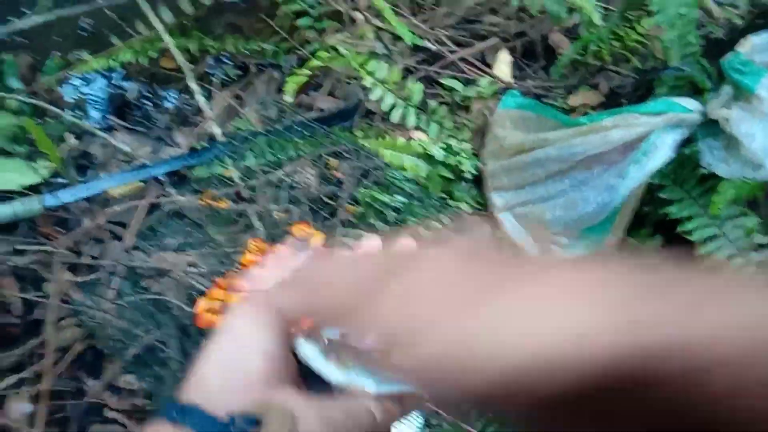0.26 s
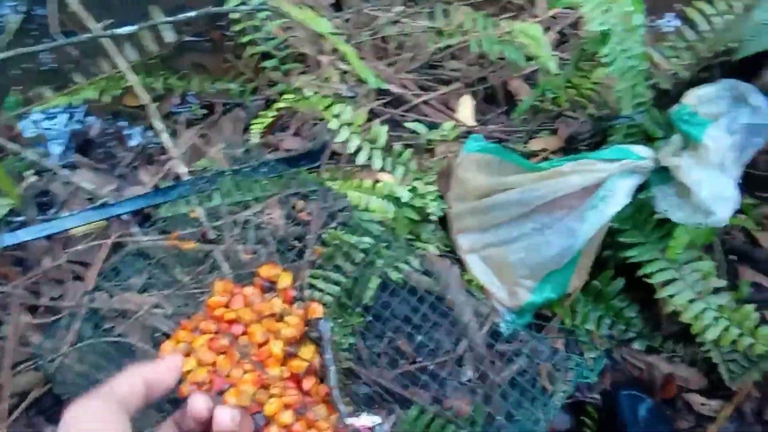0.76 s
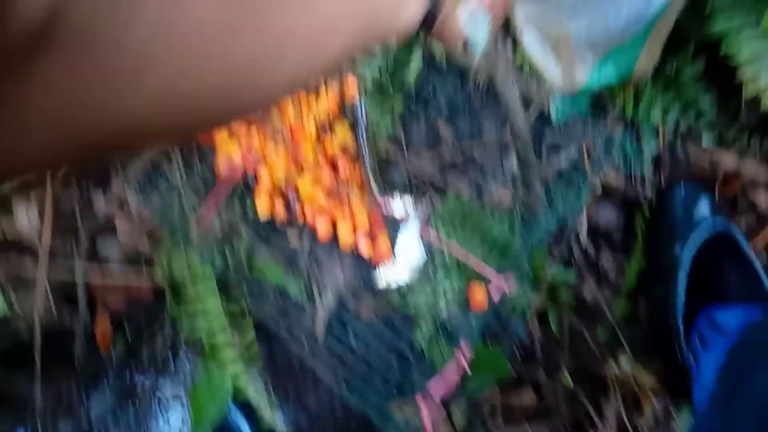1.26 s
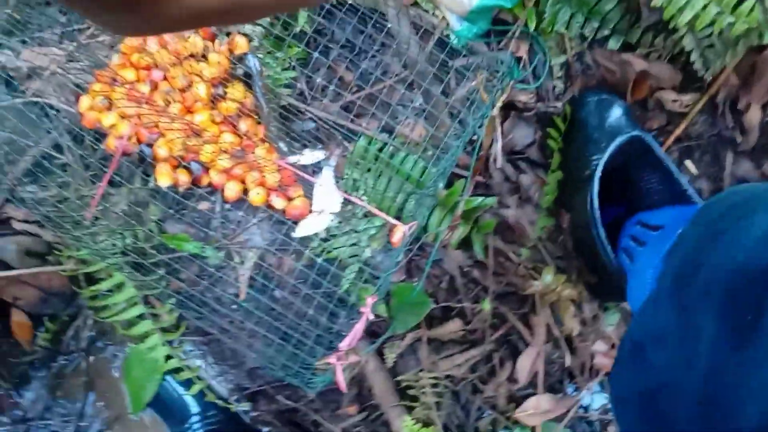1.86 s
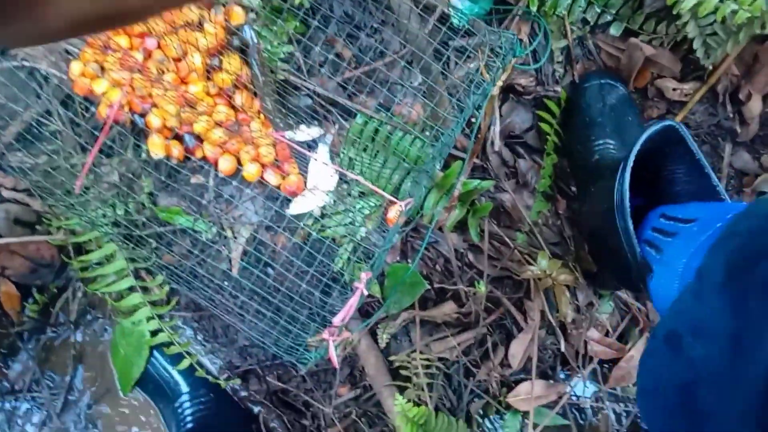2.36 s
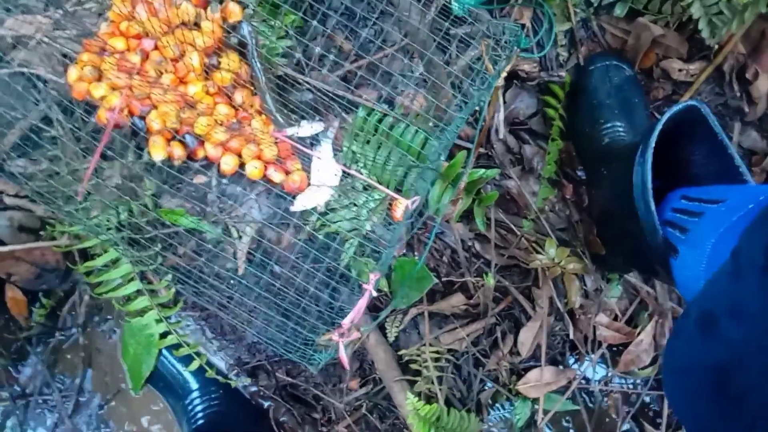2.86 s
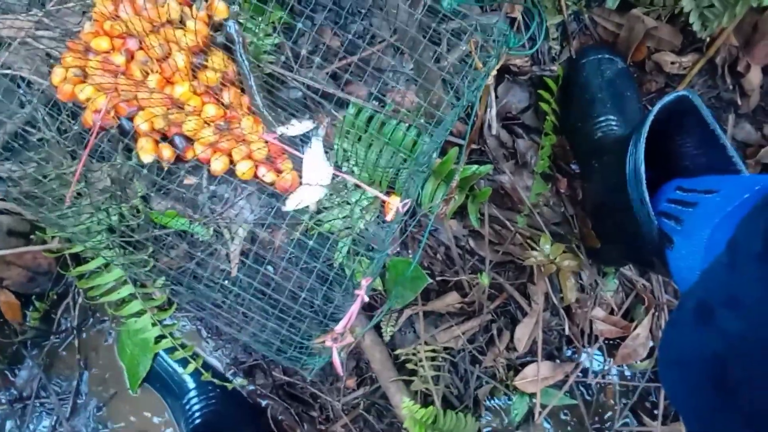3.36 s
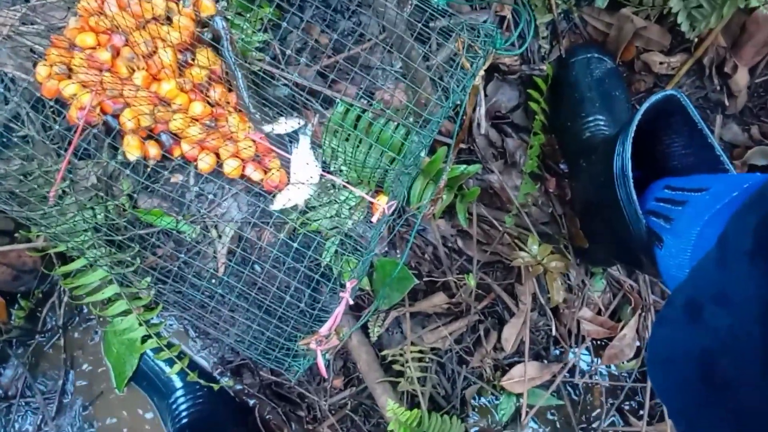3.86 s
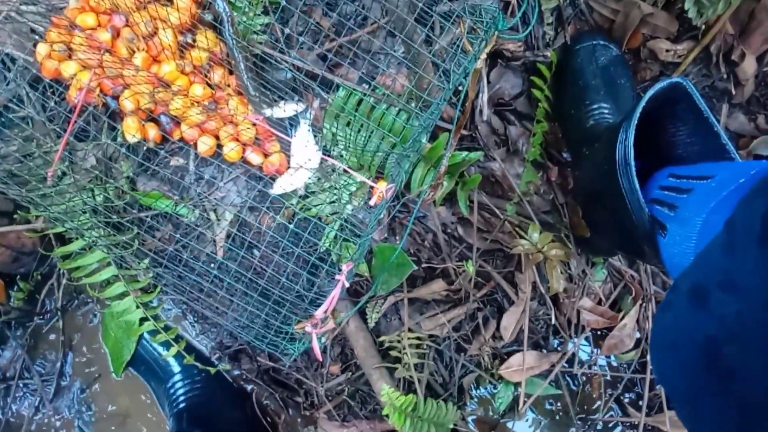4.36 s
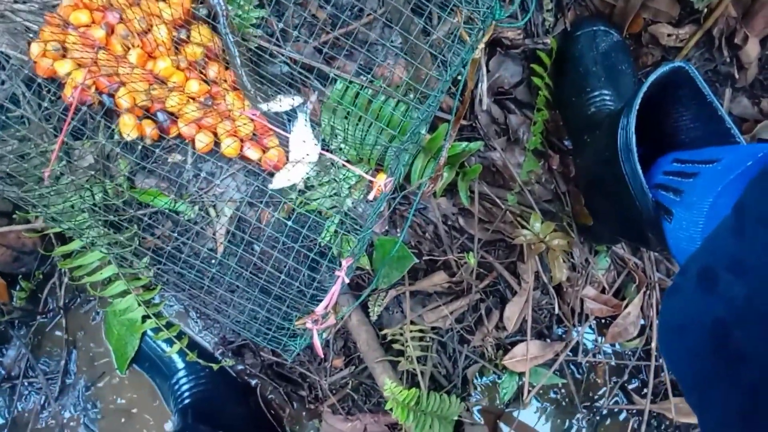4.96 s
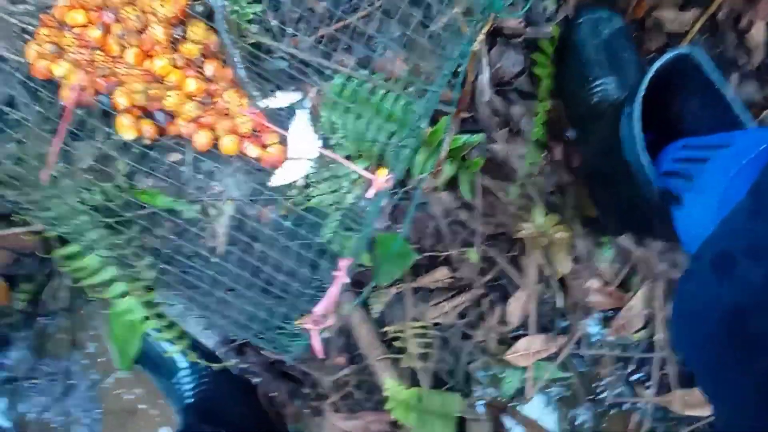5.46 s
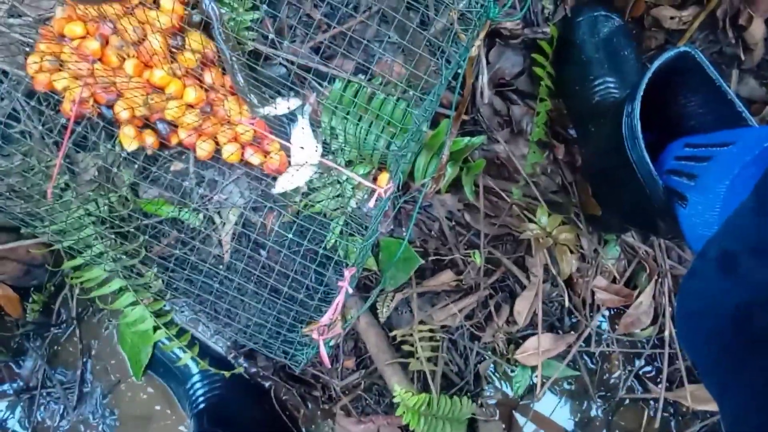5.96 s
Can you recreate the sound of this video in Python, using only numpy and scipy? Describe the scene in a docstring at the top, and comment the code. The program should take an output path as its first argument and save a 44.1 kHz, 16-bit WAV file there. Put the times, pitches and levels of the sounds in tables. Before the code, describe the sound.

Throughout, distant insects make a steady, shrill drone in a swampy forest, with one nearby cricket pulsing rapidly inside it and a very faint rush of air beneath. Between about 0.3 and 0.9 seconds a small frog croaks four times, each croak short, bright and ringing briefly among the trees. These are the loudest sounds, along with a sharp bump on the small camera's microphone during the third croak. Softer handling thumps follow until about 2 seconds. From around 1 second someone shifts close by: dull shuffling, dead leaves rustling and twigs ticking, with a sharper snap near 3.2 seconds. A short lull leaves mostly the insects. From about 4.2 seconds fern fronds tick lightly against a wire net, and from 5.4 seconds they rustle and click louder, with a few faint wire scrapes, until the end just after 6 seconds.

```python
"""A swampy forest floor, on a small camera's microphone. From the start, far insects merge into a shrill
drone and one near cricket pulses in it, scraping its wings. In the first second a small frog croaks four
times, pulses ringing its throat; on the third croak the camera is bumped, and softer pushes follow.
Someone shifts about close by: dead leaves rustle and twigs tick until just after 3 s. After a lull,
fern fronds rustle and tick on a wire net, louder towards the end."""
import sys
import numpy as np
from scipy import signal
from scipy.fft import rfft, irfft, next_fast_len
from scipy.io import wavfile
from scipy.ndimage import uniform_filter1d, map_coordinates

SR = 44100
rng = np.random.default_rng(int(sys.argv[2]) if len(sys.argv) > 2 else 0)


def store_wav(level_fs):
    """Save 16-bit WAV to argv[1]."""
    pcm = np.round(np.clip(np.atleast_2d(level_fs), -1, 1) * 32767)
    wavfile.write(sys.argv[1], SR, pcm.T.astype(np.int16))


N = 274302


def amp(db):
    return 10 ** (np.asarray(db) / 20)


def unit(x):
    return x / np.sqrt(np.mean(x ** 2) + 1e-20)


def along(points, hz):
    """Reads (f/Hz, value) points on a log axis."""
    f, v = np.transpose(points)
    return np.interp(np.log(hz + 1), np.log(f + 1), v)


def curves(rows):
    """One value per sample for each column after the time."""
    s, *cols = np.transpose(rows)
    return [np.interp(np.arange(N) / SR, s, c) for c in cols]


def wobble(rate):
    """A smooth random curve, rate knots a second."""
    return map_coordinates(rng.standard_normal(int(N * rate / SR) + 4), [np.arange(N) * rate / SR])


def filtered(x, response):
    """x through a complex frequency response."""
    m = next_fast_len(len(x) + min(4 * len(x), SR // 4))
    return irfft(rfft(x, m) * response(np.fft.rfftfreq(m, 1 / SR)), m)[:len(x)]


def peak(f, hz, width):
    """A causal resonance of gain 1."""
    return 1j * f * width / (hz * hz - f * f + 1j * f * width)


def rush(spectrum, source, patchy_db):
    """The source coloured, with patches of random gain, at rms 1."""
    z = signal.stft(source, nperseg=512)[2]
    field = uniform_filter1d(uniform_filter1d(rng.standard_normal(z.shape), 6, 0), 8, 1)
    patchy = signal.istft(z * amp(patchy_db * unit(field)), nperseg=512)[1][:N]
    return unit(filtered(patchy, lambda hz: amp(along(spectrum, hz))))


def add(track, s, sound):
    """Mixes a sound in at s seconds."""
    part = track[round(s * SR):][:len(sound)]
    part += sound[:len(part)]


# Modes of the frog's throat: f/throat pitch, level/dB, t60/s, change as the air pressure falls/dB
THROAT_MODES = [(0.462, -11, 0.023, -6.5), (.63, -5.5, 0.013, -13), (.92, -21.5, 0.004, -18),
                (1.002, 16, 0.0034, -10), (1.169, -2.5, 0.0047, 0), (1.45, -17, 0.0099, -25.5)]


def throat_pulse(hz, sustain, done):
    """One pulse rings the throat, which sinks in pitch and dulls as done runs from 0 to 1."""
    t = np.arange(SR // 25) / SR
    slack = 1 / (1 + np.exp((.62 - done) / 0.12))  # pressure gives way in the last third
    phase = 2 * np.pi * hz * (1 - 0.12 * done) * t
    ring = sum(amp(db + drop * slack - 60 * t / (t60 * sustain)) * np.sin(ratio * phase)
               for ratio, db, t60, drop in THROAT_MODES)
    return ring * (1 - np.exp(-t / (0.00017 + 0.00029 * slack)))


# The frog's calls: t/s, rms level/dB, length/s, first and last pulse rate/Hz, throat pitch/Hz,
# t60 factor, unevenness (0-1), gain of the hollow/dB, peak of the lingering mode/dB
CROAKS = [(0.2969, -25.5, 0.041, 290.7, 557, 3236, 1.3, 0.059, -.5, -37),
          (0.4645, -30.5, .04, 311.4, 434, 3046, 0.9, 0.42, 1.5, -47),
          (0.634, -26, .036, 355.8, 415.5, 3004, 2.3, 0.41, 0.85, -51),
          (0.811, -26.5, 0.032, 337.3, 452, 2860, 2.4, 0.43, 2, -47)]
# The hollow that rings after each call: f/Hz, level/dB, t60/s
HOLLOW_MODES = [(1165, -10, .05), (1370, -9, .05), (1715, -7, .07), (1850, -8, .07), (2354, -9, .1),
                (2487, -8, .1), (2583, -2, .1), (2675, -2, .1), (2975, -8, .25), (3097, -4, .1)]


def frog(linger_hz=2862, linger_t60=.32):
    """Quickening throat pulses make each croak; a hollow and the trees ring on, and one mode lingers."""
    out, t = np.zeros(N), np.arange(SR // 4) / SR
    width = lambda t60: np.log(1000) / np.pi / t60
    for s, db, length, first, last, hz, sustain, uneven, hollow_db, linger_db in CROAKS:
        rate = first + (last - first) * np.clip(t / length, 0, 1) ** 1.5
        new_pulse = np.diff(np.floor(np.cumsum(rate) / SR)) > 0
        onsets = np.r_[0, t[1:][new_pulse & (t[1:] < length)]]
        croak = np.zeros(len(t))
        for when, (late, size) in zip(onsets, uneven * rng.standard_normal((40, 2))):
            done = when / length
            pulse = amp(9.7 * size * np.sqrt(done)) * throat_pulse(hz, sustain, done)
            add(croak, abs(when + late * done / first / 2), pulse)
        croak = filtered(croak, lambda f: (peak(f, 1130, 1090) * 1j * f / 900) ** 4
                         / (1 + 1j * f / 5000) ** 3)
        croak *= amp(db) / np.sqrt(np.sum(croak ** 2) / (length * SR))
        modes = [(c, amp(g + hollow_db + rng.normal(0, 0.91)), width(t60)) for c, g, t60 in HOLLOW_MODES]
        hollow = filtered(croak, lambda f: sum(gain * peak(f, c, w) for c, gain, w in modes))
        lingering = filtered(croak, lambda f: peak(f, linger_hz, width(linger_t60)))
        waver = amp(linger_db + 2.2 * wobble(55)[:len(t)])
        add(out, s, croak + hollow + waver * lingering / abs(lingering).max())
        add(out, s + 0.0044, amp(-19) * echo(croak))
    return out


# Handling noise, right at the microphone: t/s, peak level before the bass cut/dB, f/Hz, t60/s
CAMERA_PUSHES = [(.6545, -24.5, 490, 0.019), (.6575, -30, 756, 0.0083), (.6612, -9.5, 283, 0.0024),
                 (0.6666, -26.5, 200, 0.012), (0.901, -34, 124, 0.041), (1.27, -32.5, 174, 0.031),
                 (1.295, -34, 207, 0.03), (1.456, -41.5, 245, 0.083), (1.683, -35, 430, 0.018),
                 (2.016, -34.5, 336, 0.05)]


def camera_bumps(crack_s=.6633, crack_db=-19, crack_hz=5500):
    """Each push starts softly and swings the camera body; the hardest makes the housing crack."""
    out, t = np.zeros(N), np.arange(SR // 10) / SR
    for s, db, hz, t60 in CAMERA_PUSHES:
        swing = np.sin(2 * np.pi * hz * t) * amp(-60 * t / t60) * (1 - np.exp(-t * hz * 4))
        add(out, s, -amp(db) * swing / abs(swing).max())
    burst = amp(-60 * t / 0.018) * rng.standard_normal(len(t))
    crack = filtered(burst, lambda f: peak(f, crack_hz, 5400))
    add(out, crack_s, amp(crack_db) * crack / abs(crack).max())
    return filtered(out, lambda f: 1 / (1 + 60 / (1j * f + 1)) ** 4)  # the microphone passes no deep bass


# Twigs and wire near the camera: t/s, peak level/dB, centre f/Hz, duller part re that peak/dB
TWIG_TICKS = [(0.7558, -45, 2700, -19), (1.374, -43, 2560, -19), (1.6092, -42, 1800, -17),
              (1.707, -43.5, 2970, -13), (1.7756, -41, 1640, -15), (1.8502, -44, 4330, -10),
              (1.8844, -47, 1310, -3), (1.8982, -44, 1793, 2), (1.9362, -32, 3240, -1),
              (2.0056, -39.5, 3150, -12), (2.0534, -38.5, 3220, -9), (2.0761, -38, 1830, -10),
              (2.1196, -33.5, 4450, -8), (2.1524, -36, 4470, -13), (2.2734, -35, 4400, -19),
              (2.3144, -36.5, 3440, -3), (2.4822, -45, 2050, -15), (2.5471, -40, 4100, -14),
              (2.576, -45.5, 2010, -16), (2.7207, -43, 3400, -12), (2.8, -38, 4060, -17),
              (2.8823, -44, 1590, -17), (2.9175, -48, 1720, -1.5), (2.9993, -39, 3770, -20),
              (3.0565, -48, 5010, -31), (3.1045, -47.5, 1450, -3), (3.1607, -41, 3350, -9),
              (3.1972, -45.5, 5800, 13.5), (3.1954, -29, 4040, -8.5), (3.2535, -38, 4100, -20),
              (3.331, -42, 4400, -20), (4.2233, -49, 3270, -17), (4.2887, -54, 2070, -14),
              (4.34, -44.5, 3820, -21), (4.3914, -47.5, 4310, -15), (4.448, -45.5, 3700, -26),
              (4.5486, -41, 3400, -16), (4.7042, -40, 3860, -7), (4.7346, -44, 4540, -8),
              (4.7625, -39, 4660, -21), (4.806, -43, 3800, -17), (4.8307, -37, 3940, -19),
              (4.8557, -47, 3180, -13), (5.0275, -47.5, 3930, -21), (5.1517, -48.5, 3560, -12),
              (5.2115, -47, 3160, -16), (5.3564, -32.5, 3800, -12), (5.441, -37.5, 4130, -7),
              (5.4768, -45, 4000, -18), (5.5059, -47.5, 1780, -5), (5.6156, -32, 4170, -17),
              (5.6501, -38, 4140, -22), (5.7034, -38, 5190, -21), (5.8344, -40, 3380, -17),
              (5.9024, -33.5, 3550, -13), (5.9204, -41, 1850, -20), (5.9274, -31, 4180, -9),
              (6.041, -41, 3170, -2), (6.1444, -39.5, 3220, 0)]


def ticks(settle_s=.018, settle_db=-9.5, scatter_db=4.5, thud_db=-16):
    """Tiny bright snaps over a duller part and a thud; each sets off two more as things settle."""
    out, t = np.zeros(N), np.arange(SR // 50) / SR
    delays = settle_s * rng.exponential(size=(len(TWIG_TICKS), 2))
    scatter = rng.standard_normal((len(TWIG_TICKS), 2, 2))
    settling = []
    for (s, db, hz, dull_db), waits, pairs in zip(TWIG_TICKS, delays, scatter):
        usual_db = min(db + settle_db, -46)
        for wait, (louder, higher) in zip(waits, pairs):
            settling.append((s + wait, usual_db + scatter_db * louder, hz * 2 ** (higher / 6), dull_db))
    for s, db, hz, dull_db in TWIG_TICKS + settling:
        snap = (amp(-60 * t / 0.0066) + amp(-16 - 60 * t / 0.051)) * rng.standard_normal(len(t))
        for centre, width, part_db in [(hz, 0.71 * hz, 0), (1400, 2200, dull_db), (400, 700, thud_db)]:
            part = filtered(snap, lambda f: peak(f, centre, width) ** 3)
            add(out, s, amp(db + part_db) * part / abs(part).max())
    return out


# Someone shifting beside the camera: t/s, rustle level/dB, shuffle level/dB
MOVEMENT = [(0, -62, -55.5), (.15, -84, -77.5), (.35, -92, -65), (.5, -68, -56), (.9, -56, -51.5),
            (1.0, -68, -63.5), (1.2, -75, -62), (1.32, -54, -49), (1.68, -55, -52), (1.75, -64, -68),
            (1.79, -54.5, -62), (1.95, -52, -51), (2.1, -52, -65), (2.2, -61, -75), (2.44, -72.5, -69),
            (2.52, -58.5, -62), (2.85, -67.5, -73.5), (3.15, -65.5, -79), (3.21, -70, -72),
            (3.75, -80, -75), (4.2, -100, -70.5), (4.75, -88, -75), (5.25, -78, -83), (5.45, -65.5, -67),
            (5.58, -57, -57.5), (5.68, -54, -62.5), (5.93, -54, -55), (5.99, -54, -59), (6.22, -61, -63)]
# Dead leaves underfoot: f/Hz, spectral level/dB
LITTER_SPECTRUM = [(290, -26), (500, -8), (861, -4), (1500, -6), (1880, -1.5), (2400, -5), (3230, -5),
                   (4580, -5.5), (5450, -10), (5800, -7), (7540, -36.5), (12800, -120)]
# Fronds on the wire net: f/Hz, spectral level/dB
FROND_SPECTRUM = [(290, -28), (500, -20), (793, -5.5), (925, 3.5), (1250, -8), (1370, -3.5), (2210, -2.5),
                  (2380, -8), (3200, -1), (4820, -5), (5800, -8.5), (7540, -34), (12800, -120)]
# Limbs close to the microphone: f/Hz, spectral level/dB
SHUFFLE_SPECTRUM = [(47, -33), (80, -5.5), (237, -3), (266, -9), (305, 2), (414, -2.5), (1200, -12.5),
                    (1560, -43), (2640, -120)]
# Scrapes on the wire: middle t/s, level/dB, half length/s
WIRE_SCRAPES = [(5.837, -57, .04), (6.01, -58, .025), (6.16, -55.5, 0.028)]


def movement(fronds_from_s=3.5, after_db=-19.5, after_t60=0.056):
    """Leaves, then fronds, rub and crackle in clumps; limbs shuffle dully and the wire is scraped."""
    rustle_db, shuffle_db = curves(MOVEMENT)
    t, after_ticks = np.arange(N) / SR, np.zeros(N)
    for s, db, *_ in TWIG_TICKS:  # leaves rustle on after each tick
        add(after_ticks, s, amp(db + after_db - 60 * t[:SR // 8] / after_t60))
    sizes = amp(4.5 * rng.exponential(size=N).clip(0, 3)) * rng.choice([-1, 1], N)
    grains = (rng.random(N) < 700 * amp(5 * wobble(30)) / SR) * sizes
    rubbing = unit(grains) + 0.92 * rng.standard_normal(N)
    leaves = rush(LITTER_SPECTRUM, rubbing, patchy_db=2)
    fronds = rush(FROND_SPECTRUM, rubbing, patchy_db=1)
    rustle = np.where(t < fronds_from_s, leaves, fronds)
    shuffle = unit(amp(2.2 * wobble(16)) * rush(SHUFFLE_SPECTRUM, rng.standard_normal(N), patchy_db=4.5))
    wire = unit(filtered(rubbing, lambda f: peak(f, 3160, 450) ** 2))
    scrapes = sum(amp(db) * np.exp(-((t - s) / half) ** 2) for s, db, half in WIRE_SCRAPES)
    fidget = amp(rustle_db + 2 * wobble(28))
    return scrapes * wire + (fidget + after_ticks) * rustle + amp(shuffle_db) * shuffle


# Resonances of the near cricket's wing: f/Hz, width/Hz, level/dB
WING_MODES = [(6940, 320, -5.5), (7005, 420, 1), (7310, 220, -16.5)]


def cricket(strokes_per_s=48.39, first_s=.0015, drift_cycles=.05):
    """Each stroke scrapes a burst into the wing, which rings; the forest answers."""
    cycles = (np.arange(N) / SR - first_s) * strokes_per_s + .5 + abs(1 + drift_cycles * wobble(4))
    stroke = np.floor(cycles).astype(int)
    from_centre_s = (cycles % 1 - .5) / strokes_per_s
    force = amp(0.92 * rng.standard_normal(stroke.max() + 1))[stroke]
    # the file's teeth pass at nearly the wing's own pitch, unevenly
    teeth = 0.36 * np.sin(2 * np.pi * np.cumsum(7055 + 25 * wobble(30)) / SR) + rng.standard_normal(N)
    scrape = force * np.exp(-(from_centre_s / 0.004) ** 2) * teeth
    wing = filtered(scrape, lambda f: sum(amp(db) * peak(f, hz, w) ** 2 for hz, w, db in WING_MODES))
    return unit(wing + amp(1) * echo(wing)[:N])


# Insects at the microphone: t/s, far chorus level/dB, near cricket level/dB
INSECT_LEVELS = [(0.0, -48, -47), (0.35, -49.5, -53.5), (0.53, -45.5, -49.5), (0.73, -47, -48),
                 (1.49, -48, -48.5), (2.08, -47.5, -46.5), (2.56, -49, -48.5), (2.94, -48, -49.5),
                 (3.67, -49.5, -49.5), (4.31, -47, -52), (4.8, -49, -48.5), (4.94, -47, -49.5),
                 (5.32, -47.5, -52.5), (5.8, -46, -53), (6.22, -47.5, -49.5)]
# The chorus far off in the forest: f/Hz, spectral level/dB
CHORUS_SPECTRUM = [(5500, -58), (5950, -20.5), (6050, -12), (6350, -7.5), (6560, -3), (6740, -4.5),
                   (6790, 2), (6850, -3.5), (7000, -5), (7200, -16.5), (7700, -20.5), (7850, -29),
                   (8250, -38), (9000, -93.5)]


def insects():
    """Far insects blur into a shrill band of noise; the near cricket slowly swells and fades in it."""
    far_db, near_db = curves(INSECT_LEVELS)
    near = cricket()
    far = rush(CHORUS_SPECTRUM, rng.standard_normal(N), patchy_db=1.5)
    return amp(near_db + 1.4 * wobble(0.99)) * near + amp(far_db) * far


# Reverberation among the trees: f/Hz, t60/s
FOREST_DECAY = [(900, 0.32), (2800, 0.35), (5500, 0.067)]


def echo(x):
    """The answer of trunks and leaves, each frequency dying at its own speed."""
    hz, t, z = signal.stft(rng.standard_normal(SR // 3), SR, nperseg=256)
    tail = signal.istft(z * amp(-60 * t / along(FOREST_DECAY, hz)[:, None]), SR, nperseg=256)[1]
    return signal.fftconvolve(x, tail / np.linalg.norm(tail))


# The still forest all around: f/Hz, spectral level/dB
AIR_SPECTRUM = [(15, -41), (25, -41), (43, -14), (82, 3), (129, -0.5), (681, -12), (2130, -15), (2550, -18),
                (4410, -18), (5060, -21.5), (5800, -16.5), (7540, -43.5), (12800, -120)]


def forest_air(level_db=-60):
    """A faint rush, strongest in the bass."""
    return amp(level_db) * rush(AIR_SPECTRUM, rng.standard_normal(N), patchy_db=2)


def scene():
    """Everything that reaches the one microphone."""
    return (forest_air() + insects() + frog() + camera_bumps() + ticks() + movement())[None]


def record(dry, top_hz=8274, hiss_db=-85):
    """The camera cuts the scene steeply at its band limit; only a faint electronic hiss lies above."""
    hiss = filtered(rng.standard_normal(N), lambda f: (f > 9700) * (f < 15500))
    return (filtered(dry[0], lambda f: f < top_hz) + amp(hiss_db) * unit(hiss))[None]


dry = scene()
out = record(dry)
store_wav(out)
```